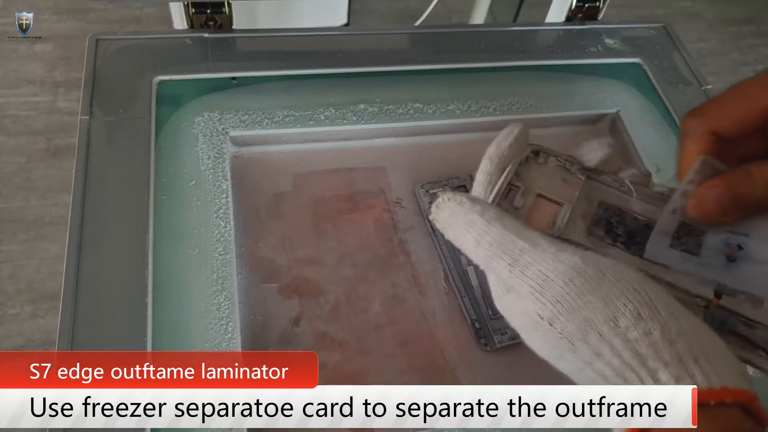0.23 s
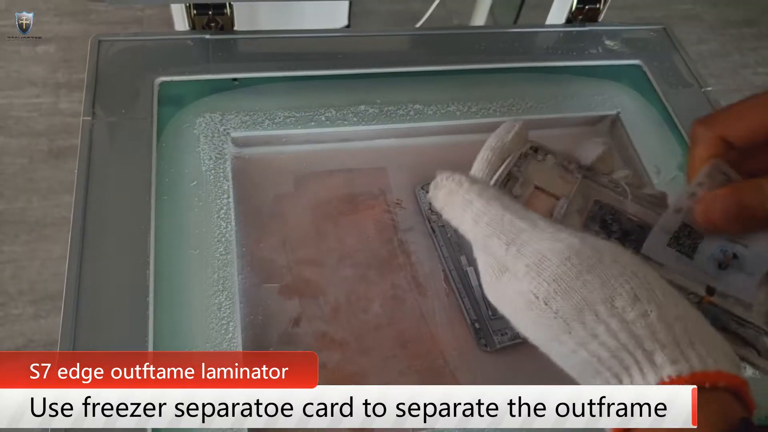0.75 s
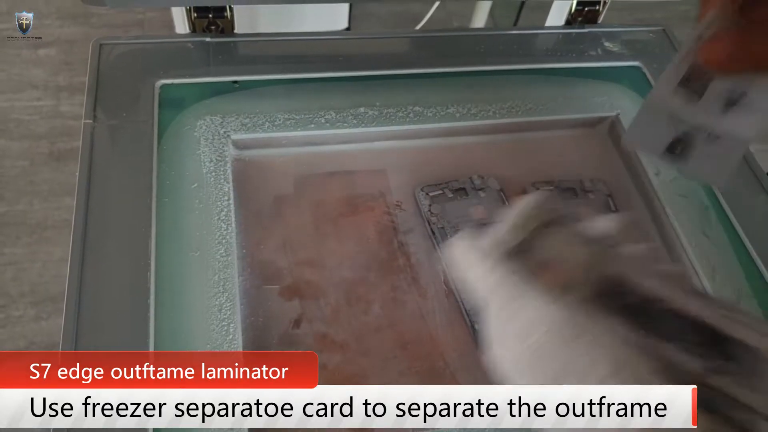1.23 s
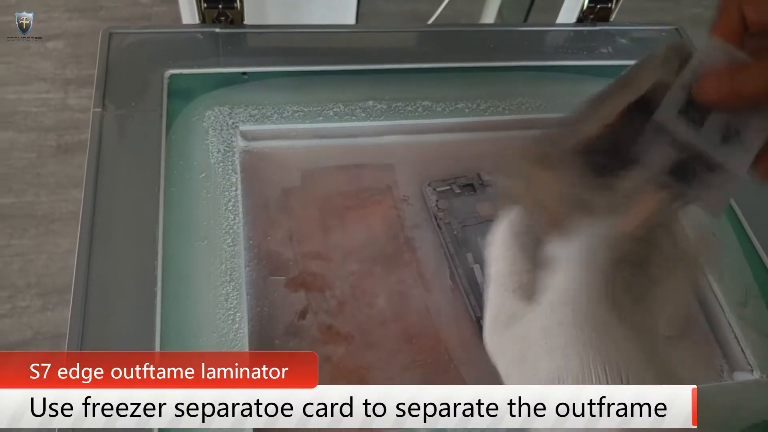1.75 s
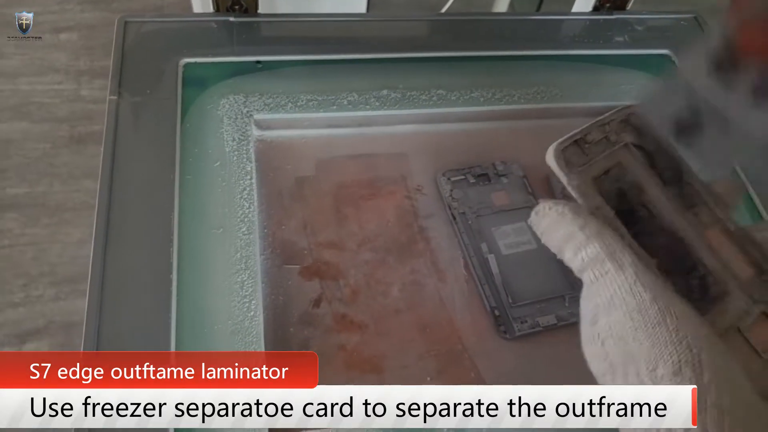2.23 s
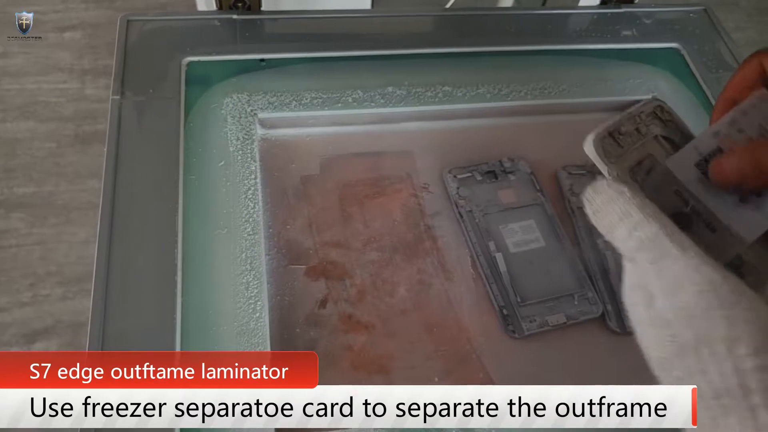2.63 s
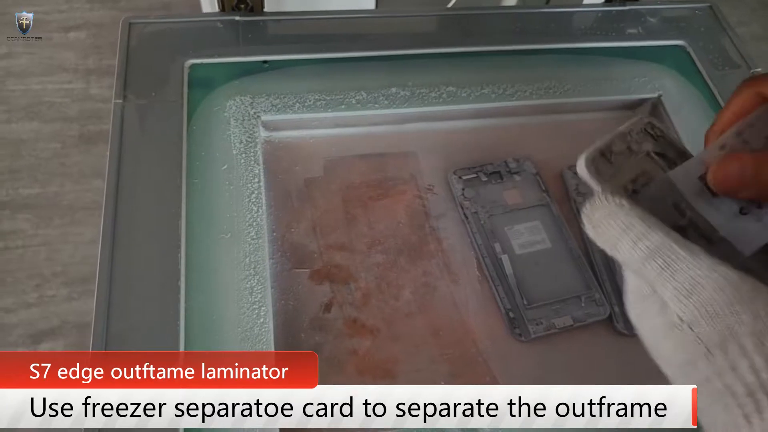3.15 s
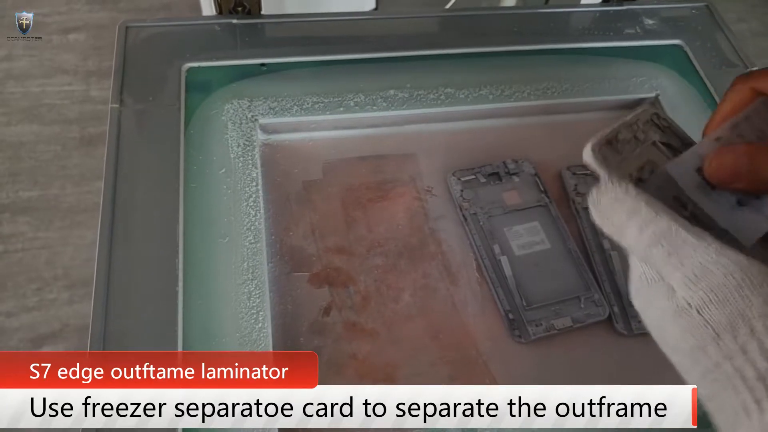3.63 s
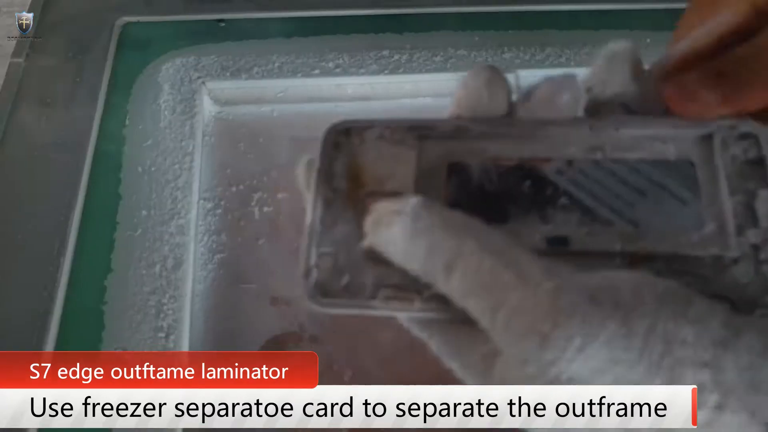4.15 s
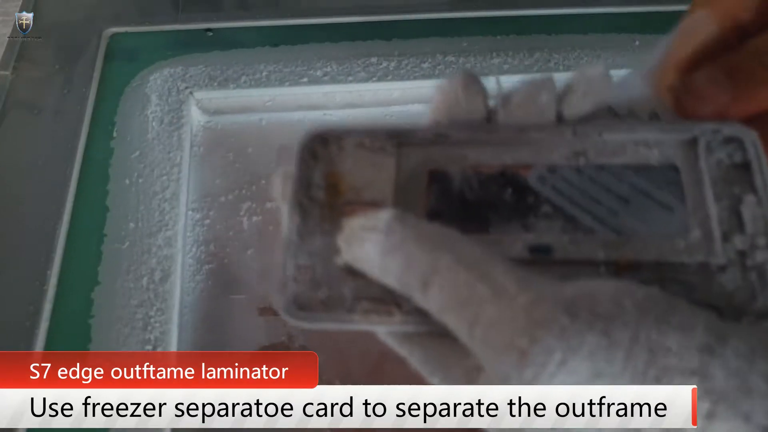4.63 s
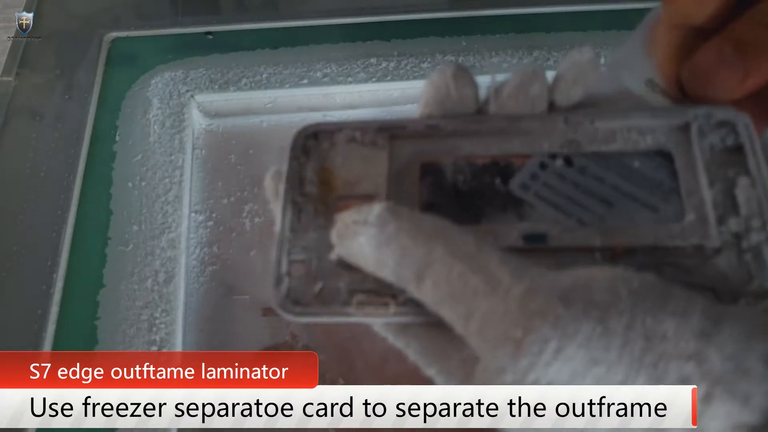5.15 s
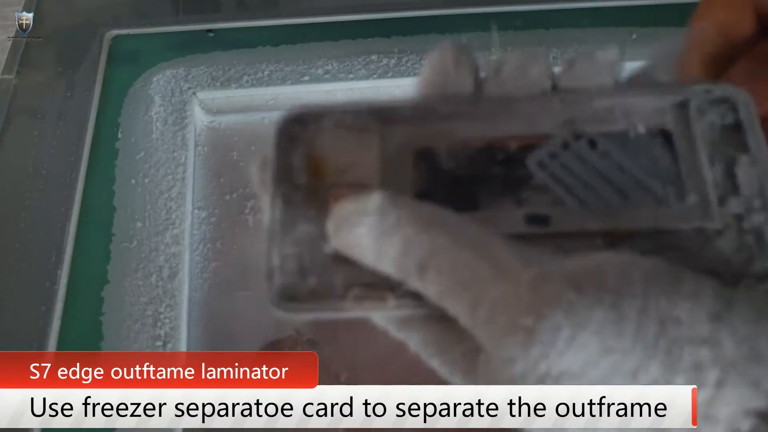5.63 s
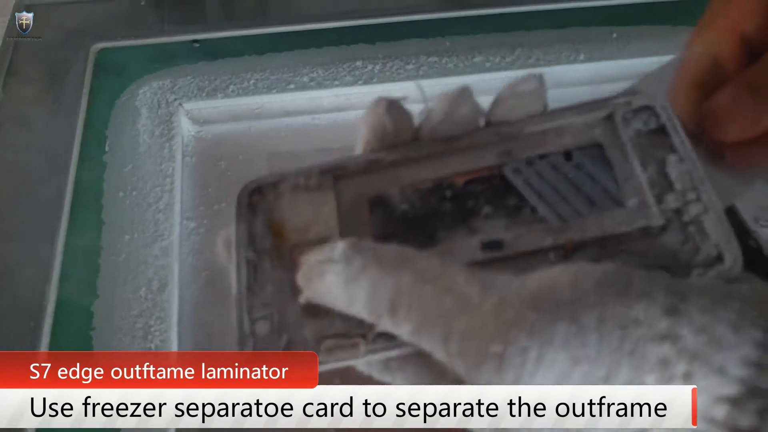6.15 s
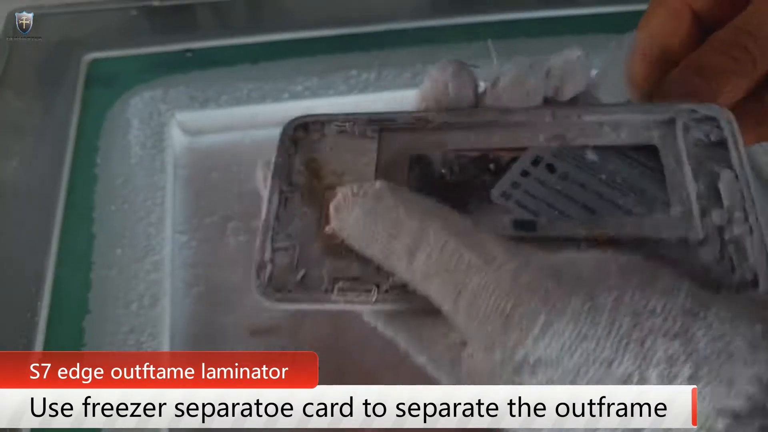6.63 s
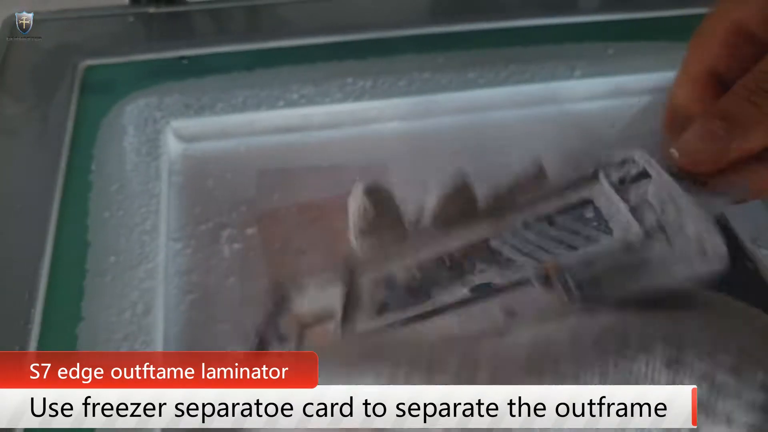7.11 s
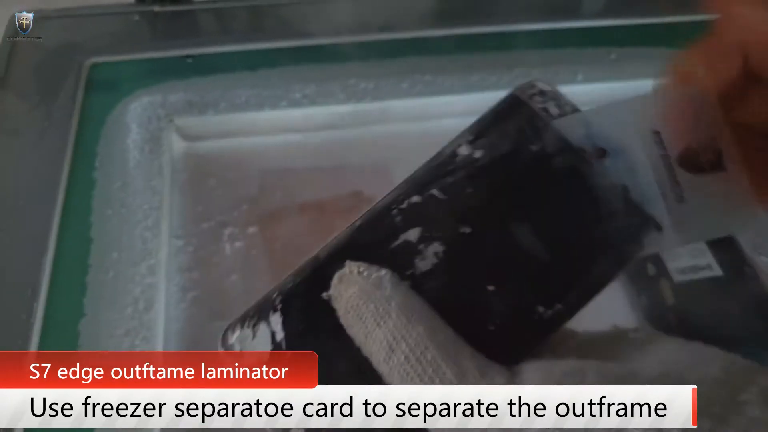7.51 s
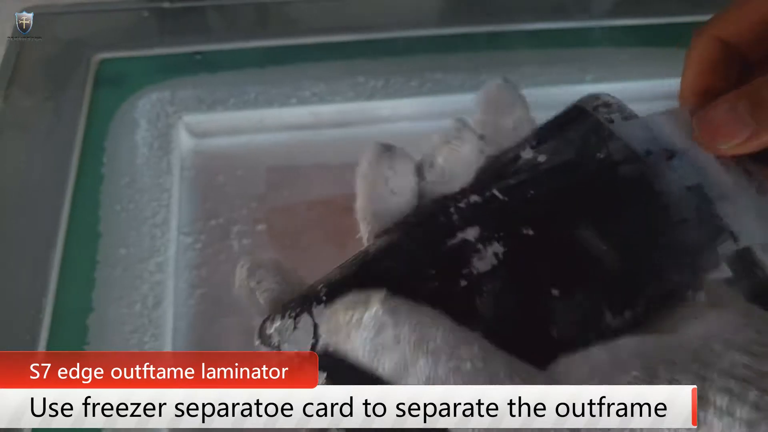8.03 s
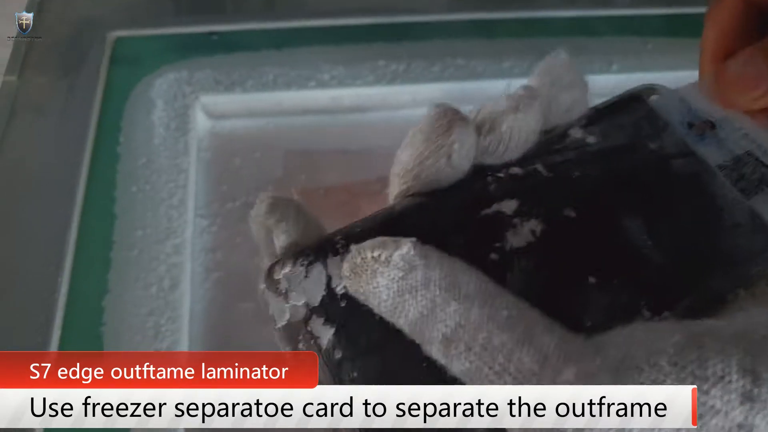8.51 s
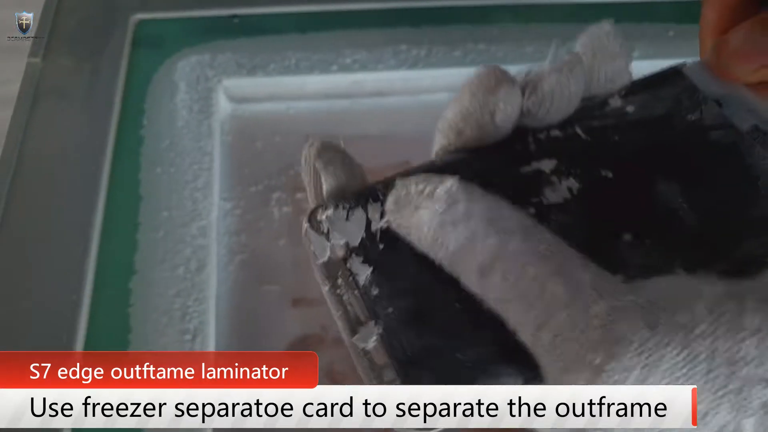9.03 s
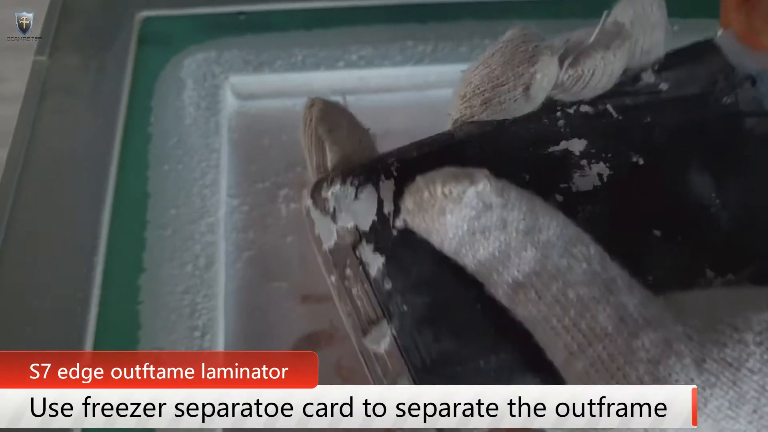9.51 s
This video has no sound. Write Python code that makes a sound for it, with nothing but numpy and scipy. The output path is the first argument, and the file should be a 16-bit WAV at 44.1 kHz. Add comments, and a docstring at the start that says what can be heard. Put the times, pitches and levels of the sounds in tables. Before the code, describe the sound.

A freezing machine in a workshop gives a low, buzzing compressor hum with breathy fan hiss, quiet at first, under a thin high whine. From 0.1 to 0.8 s a card ticks and scrapes rapidly at a frozen phone frame; a stronger ringing snap with a short scrape comes near 1.1 s. Handling then thins to sparse ticks as the hum swells towards 3 s and the whine pulses about four times a second. Clicks and scrapes come around 3.5 s. At 4.2 s the microphone is suddenly close and the whine disappears. Sharp cracks fall at 4.8 and 5.5 s, where the hum drops abruptly and stays subdued. Small ticks lead to a snap at 6.65 s; the hum returns, peaking about 8 s, with a faint whine. Bright snaps and brief scrapes cluster from 8.0 to 9.0 s, with crisp clicks at 9.4 and 9.7 s.

```python
"""A freezer plate for separating phone screens hums in a workshop: compressor harmonics over fan noise.
The hum swells, dips and returns; its high whine drops out once the microphone is close, then returns faintly.
A plastic card is worked into a frozen phone: impulsive ticks and snaps ring the frame, and short
strokes of the card are stick-slip chatter. Knocks are brief swells of one resonance, frost is faint ticks;
drones and thin whistles are single tones that fade in and out."""
import sys
import numpy as np
from scipy import signal
from scipy.fft import rfft, irfft
from scipy.io import wavfile

SR = 44100
rng = np.random.default_rng(int(sys.argv[2]) if len(sys.argv) > 2 else 0)


def file_out(sig):
    """Save sig as 16-bit WAV at sys.argv[1]."""
    # one column per channel
    cols = np.atleast_2d(sig).T
    # limit, then scale
    lim = np.clip(cols, -1, 1)
    pcm = np.round(lim * 32767).astype(np.int16)
    wavfile.write(sys.argv[1], SR, pcm)


N = 430857  # samples

SHAFT_HZ = 48.21
CLOSE_S = 4.18  # from here on the microphone is close over the plate
FADE_S = 0.077  # fade of the whistles and of the whine's beat


def undb(db):
    """Level as amplitude ratio: 20 dB is a factor of ten."""
    return 10 ** (np.asarray(db) / 20)


def curve(rows, column):
    """Envelope: one column of a timed table, joined by straight lines."""
    rows = np.array(rows)
    return np.interp(np.arange(N) / SR, rows[:, 0], rows[:, column])


def colour(rows, hz, column=1):
    """Spectral envelope: gain of a table joined by straight lines in dB over log frequency."""
    rows = np.array(rows)
    return undb(np.interp(np.log(hz + 1), np.log(rows[:, 0]), rows[:, column]))


def bell(hz, centre, width):
    """Lorentzian resonance curve, 1 at its centre."""
    return 1 / (1 + (2 * (hz - centre) / width) ** 2)


def resonances(rows, hz):
    """Modal colouring: gain of resonance peaks whose decibels add."""
    return undb(sum(db * bell(hz, centre, width) for centre, width, db in rows))


def walk(rate):
    """Random modulation: normal draws, `rate` of them per second, joined by straight lines."""
    knots = rng.standard_normal(int(N / SR * rate) + 2)
    return np.interp(np.arange(N) / SR * rate, np.arange(len(knots)), knots)


def hold(start, end, fade_s):
    """Trapezoidal envelope: fade in, hold, fade out."""
    t = np.arange(N) / SR
    return np.clip(np.minimum(t - start, end - t) / fade_s, 0, 1)


def add(out, s, sound):
    """Superposition: mix a stereo sound in at time s."""
    i = max(int(s * SR), 0)
    out[:, i:i + sound.shape[1]] += sound[:, :max(N - i, 0)]


def ports(mid, side):
    """Sum and difference: left and right port from mid and side."""
    return np.array([mid + side, mid - side])


def tone(phase, hz, wide_hz=1400):
    """Interaural phase: a sine of rms 1, further out of step between the ports the higher it is."""
    start = rng.uniform(0, 2 * np.pi)
    apart = np.pi / 4 * np.tanh((hz / wide_hz) ** 1.8)
    return np.sqrt(2) * np.sin(phase + start + np.array([[-apart], [apart]]))


def steady(hz, db, wander=0.6):
    """Phase modulation: a tone of fixed pitch whose phase wanders (radians)."""
    return undb(db) * tone(2 * np.pi * hz * np.arange(N) / SR + wander * walk(9.2), hz)


def closeness(s):
    """Proximity: 0 while the microphone is afar, 1 once it is close over the plate."""
    return np.clip((s - CLOSE_S) / 0.013 + .5, 0, 1)


# one shared loudness curve for hum, fan rush and frost: (time [s], level [dB])
SHARED_LEVEL = [(0, -30), (0.52, -30.5), (1.25, -28.5), (2.47, -23), (3.07, -21.5), (3.51, -23),
                (4.76, -22), (5.03, -25.5), (5.52, -27), (5.535, -40), (5.55, -31), (5.93, -34),
                (6.62, -34), (6.85, -26.5), (7.13, -23.5), (7.78, -22), (8.03, -18.5), (8.62, -25),
                (9.77, -25.5)]
USUAL_DB, RUSH_FOLLOWS = -25, 0.9  # the usual level of the shared curve; dB of fan rush per dB of hum


def machine(hum_db=0, rush_db=-27):
    """Common modulation: compressor, casing and fan swell together; whine, drones, whistles lie on top."""
    close = closeness(np.arange(N) / SR)
    level_db = curve(SHARED_LEVEL, 1)
    turns = np.cumsum(SHAFT_HZ * (1 + 0.00026 * walk(5))) / SR
    tones = compressor(turns, close) + casing(turns, close) + fan_motor(close)
    hum = undb(level_db + hum_db) * tones
    rush = undb(rush_db + RUSH_FOLLOWS * (level_db - USUAL_DB)) * flicker(fan(turns, close))
    return hum + rush + whine(turns) + drones() + whistles()


# compressor harmonics, levels relative to the machine's:
# (multiple of the shaft rate [whole number], level from afar [dB], level from close [dB])
SHAFT_HARMONICS = [(4, 0, -1), (5, -23.5, -25), (6, -20, -16), (7, -26.5, -30.5), (8, -28.5, -27.5),
                   (9, -22.5, -30), (10, -31, -35.5), (15, -19.5, -22), (22, -15.2, -30),
                   (23, -28.5, -32.5), (24, -32, -38), (34, -40, -36), (37, -32, -42), (39, -43, -38),
                   (41, -26.5, -29.5), (42, -34, -33.5), (47, -32.5, -47), (53, -37, -43), (54, -24.5, -33),
                   (58, -26, -35), (61, -50, -37), (65, -42, -39), (78, -35, -42.5), (80, -40, -38),
                   (82, -37, -55), (84, -32.5, -46), (89, -39, -43), (148, -36, -42)]


def compressor(turns, close, waver_db=1.9, hum_waver_db=0.24):
    """Harmonic series of a rotating shaft; the fourth booms steadily, the others waver."""
    out = 0
    for row, (multiple, far_db, close_db) in enumerate(SHAFT_HARMONICS):
        order = round(multiple)
        waver = (waver_db if row else hum_waver_db) * walk(11)
        db = far_db + (close_db - far_db) * close + waver
        out = out + undb(db) * tone(2 * np.pi * order * turns, order * SHAFT_HZ)
    return out


# envelope of the casing's buzz, one line on every shaft multiple: (frequency [Hz], relative level [dB])
CASING_BUZZ = [(1400, -35), (1700, -36.5), (2300, -36), (3100, -63), (4400, -45.5), (5000, -54),
               (6600, -49), (7300, -44), (8300, -55.5), (11500, -63)]


def casing(turns, close, uneven_db=2, close_db=-2, buzz_db=-1):
    """Periodicity: a fine rattle repeats on every shaft turn, with its own waveform at each port."""
    size = 4096  # points in one turn
    hz = np.arange(size // 2 + 1) * SHAFT_HZ
    inside = (hz > CASING_BUZZ[0][0]) * (hz < CASING_BUZZ[-1][0])
    uneven = undb(uneven_db * rng.standard_normal((2, len(hz))))
    lines = colour(CASING_BUZZ, hz) * inside * uneven
    phases = np.exp(2j * np.pi * rng.random(lines.shape))
    turn = irfft(lines * phases) * size / np.sqrt(2)
    rattle = np.array([np.interp(turns % 1, np.arange(size) / size, port) for port in turn])
    return rattle * undb(buzz_db + close_db * close + 1.5 * walk(8.1))


# tones of the fan motor, relative to the machine's level:
# (frequency [Hz], level from afar [dB], level from close [dB])
MOTOR_TONES = [(111.4, -24.5, -25.5), (3010, -30, -44)]


def fan_motor(close):
    """Tonal motor noise: single lines independent of the shaft, with wandering phase."""
    return sum(steady(hz, far_db + (close_db - far_db) * close) for hz, far_db, close_db in MOTOR_TONES)


# spectrum of fan and refrigerant noise:
# (frequency [Hz], relative density from afar [dB per Hz], relative density from close [dB per Hz])
RUSH_SPECTRUM = [(25, -58, -61), (56.3, -39.5, -42.5), (130, -39, -42), (199, -31, -35.5),
                 (415, -37.5, -42), (720, -37.5, -40.5), (1145, -45.5, -49.5), (1470, -52, -56.5),
                 (2000, -49.5, -52), (2920, -49.5, -54.5), (5250, -59.5, -64), (7500, -63, -65),
                 (12200, -58, -61), (16200, -65, -65)]
# narrow resonances in the hiss: (frequency [Hz], width [Hz], boost [dB])
HISS_RESONANCES = [(2120, 130, 1.5), (5660, 170, 4.5), (7360, 250, 11.5), (8080, 230, 7.5),
                   (9140, 250, 3.5), (11100, 320, 2.5)]


def fan(turns, close, wide_hz=750, throb=0.14, flutter_db=2.5, bass_apart=0.034):
    """Coherence of broadband noise: the bass is nearly alike at both ports, the treble unrelated."""
    hz = np.arange(N // 2 + 1) * SR / N
    alike = np.clip(1 - bass_apart, 0, 1) / (1 + (hz / wide_hz) ** 2)
    mid, side = rfft(rng.standard_normal((2, N)))
    noise = ports(mid * np.sqrt((1 + alike) / 2), side * np.sqrt((1 - alike) / 2)) * np.sqrt(SR / 2)
    noise = noise * resonances(HISS_RESONANCES, hz)
    far, near = (irfft(noise * colour(RUSH_SPECTRUM, hz, column), N) for column in (1, 2))
    rush = far * (1 - close) + near * close
    shaft_throb = 1 + throb * np.sin(2 * np.pi * turns)
    return rush * shaft_throb * undb(flutter_db * walk(14))


def flicker(noise, depth_db=1.1):
    """Band modulation: the treble flickers, fast and slow, partly together and partly band by band."""
    hz, spectrum = np.arange(N // 2 + 1) * SR / N, rfft(noise)
    shared = walk(30) + 0.25 * walk(3.5)
    out = noise
    for low, high in [(4500, 7000), (7000, 10500), (10500, 17000)]:
        band = irfft(spectrum * (hz >= low) * (hz < high), N)
        gain = undb(depth_db * (shared + 2.1 * walk(26)))
        out = out + band * (gain - 1)
    return out


# mean level of the high whine: (time [s], level [dB])
WHINE_LEVEL = [(0, -47.5), (0.45, -50.5), (0.85, -46), (1.3, -54), (1.7, -44), (1.88, -54), (2.3, -43),
               (2.88, -37.5), (3.2, -39), (4.16, -37), (4.2, -85), (6.6, -69), (7, -55.5), (8.1, -52),
               (9.77, -56.5)]
WHINE_MULTIPLE = 60  # of the shaft rate
BEAT_FROM_S, BEAT_S = 2.095, 0.258  # first crest and period of the beat
BEAT_DB = (3.5, 2)  # beat depth at the left and right port


def whine(turns, wander=0.15, waver_db=.5):
    """Beating of a high shaft harmonic: an even rise and fall in level until the microphone is close."""
    phase = 2 * np.pi * WHINE_MULTIPLE * turns + wander * walk(40)
    since_crest = np.arange(N) / SR - BEAT_FROM_S
    beat = hold(BEAT_FROM_S, CLOSE_S, FADE_S) * np.cos(2 * np.pi * since_crest / BEAT_S)
    db = curve(WHINE_LEVEL, 1) + waver_db * walk(16.0) + np.outer(BEAT_DB, beat)
    return undb(db) * tone(phase, WHINE_MULTIPLE * SHAFT_HZ, wide_hz=3060)


# the frame ticks and snaps; levels are relative, lifted further on:
# (time [s], level [dB], body ring [dB], edge ring [Hz], treble tilt [dB])
FRAME_SNAPS = [(0.114, -16, -34, 4000, -15), (0.146, -18, -30, 6800, -10), (0.157, -15.5, -33, 11100, -12),
               (0.222, -17, -13, 3900, -12), (0.3386, -13, -30, 4400, -13), (0.3448, -9, -26, 7600, -11),
               (0.366, -20, -17, 4460, -9), (0.374, -15, -34, 3000, -8), (0.444, -26, -31, 7040, -24),
               (0.479, -27, -28, 7500, -4), (0.5403, -11, -41, 4120, -10), (0.65, -19.5, -35, 4260, -14),
               (0.749, -19.5, -36, 4320, -25), (1.0799, -12.5, -27, 4170, -28), (1.1614, -9, 2, 4240, -29),
               (1.168, -17.5, -14, 3000, -28), (1.658, -23, -28, 11000, -17), (2.051, -16, -28, 3200, -52),
               (2.561, -19, -28, 7500, -13), (2.6253, -21, -28, 6500, -3), (3.2365, -11, -37, 3300, -16),
               (3.484, -10, -34, 6190, -14.5), (4.167, -13, -11, 4670, -11), (4.305, -27, -20, 5000, -19),
               (4.6487, -20, -24, 5970, -4), (4.785, -15.5, -6, 4500, -19), (4.8352, -7, -18, 7360, -18),
               (4.8417, -4, -16, 10200, -15), (5.2674, -22.5, -23, 7500, -17),
               (5.5024, -19, -18, 4000, -16), (5.515, -16, -26, 4730, -13), (5.522, -15, -24, 6500, -13),
               (5.531, -3.5, -17, 12500, -6), (5.649, -22.5, -18, 10600, -18),
               (6.103, -26.5, -25, 7000, -13), (6.133, -25.5, -27, 6300, -10),
               (6.146, -25.5, -24, 5300, -16), (6.1943, -31, -24, 6000, -10),
               (6.6503, -12.5, -18, 3980, -9), (6.729, -26, -7, 3900, -13), (6.807, -20.5, -5, 6960, -6),
               (6.999, -19.5, -18, 6740, -16), (7.4743, -25, -16, 7000, -5), (7.846, -23, -22, 7000, -12),
               (8.046, -6, -11, 7550, -3), (8.06, -17, 4, 3000, -20), (8.125, -13.5, -25, 7450, -5),
               (8.3627, -5.5, -0.5, 14500, -2), (8.411, -7, -17, 14400, -9.5), (8.549, -11, -4, 14900, -15),
               (8.776, -15, -18, 13300, -14), (8.927, -20, -28, 15000, -6), (8.954, -16, -28, 15000, -7),
               (9.006, -26, -24, 11900, -19), (9.037, -27, -26, 7000, -15), (9.3657, -5, -20, 7000, -13),
               (9.7205, -11, -21, 14100, -11.5), (9.756, -12.5, -12, 12200, -10)]


def snaps(snap_db=14, edge_width_hz=900, edge_db=8):
    """Impulsive release: frozen glue lets go, and each contact rings its own edge mode and brightness."""
    out = np.zeros((2, N))
    for s, db, body_db, edge_hz, treble_db in FRAME_SNAPS:
        edge = [(edge_hz, edge_width_hz, edge_db)]
        add(out, s, undb(db + snap_db) * crack(np.ones(1), body_db, treble_db, edge))
    return out


# modes of the phone's frame: (frequency [Hz], width [Hz], relative level [dB])
FRAME_MODES = [(1616, 410, 7), (1710, 260, 0.5)]
# colour of the crack itself: (frequency [Hz], relative level [dB])
CRACK_COLOUR = [(300, 3), (900, 1), (2500, 6.5), (4100, 10.5), (5200, 10), (6800, 11.5), (9000, 11),
                (12000, 14), (15500, 11)]
PATCH_HZ = 259.6  # spacing of the frame's many small resonances


def crack(slips, body_db, top_db, edge=(), contact_s=0.0025, room_db=-21,
          ring_db=22, lift_db=12, patchy_db=4.0):
    """Source and filter: slips (energy per sample) free noise bursts, frame modes colour them. Energy 1."""
    size, room_s = 8192, .016
    t, hz = np.arange(size) / SR, np.arange(size // 2 + 1) * SR / size
    swell = t / contact_s
    contact = swell ** 2 * np.exp(2 - 2 * swell)
    room = undb(room_db) * (1 - np.exp(-swell)) * np.exp(-t / room_s)
    energy = np.abs(signal.fftconvolve(slips, (contact + room) ** 2)[:size])
    burst = rng.standard_normal((2, size)) * np.sqrt(energy)
    # the treble tilt grows from 5 to 12 kHz
    gain = colour(CRACK_COLOUR, hz) * undb((top_db + lift_db) * np.clip((hz - 5000) / 7000, 0, 1))
    gain = gain + sum(undb(body_db + ring_db + db) * bell(hz, f, width) for f, width, db in FRAME_MODES)
    gain = gain * resonances(edge, hz)
    gain = gain * undb(patchy_db * np.interp(hz / PATCH_HZ, np.arange(size), rng.standard_normal(size)))
    # minimum phase: the ring follows the blow, never precedes it
    cepstrum = irfft(np.log(gain))
    fold = np.r_[1, np.full(size // 2 - 1, 2), 1, np.zeros(size // 2 - 1)]
    causal = np.exp(rfft(cepstrum * fold))
    sound = irfft(rfft(burst) * causal)
    return sound / np.sqrt(np.sum(sound ** 2) / 2)


# the card slides: (time [s], length [s], level at the start [dB], level at the end [dB],
# edge ring [Hz], edge ring boost [dB], mean slip rate before unevenness [1/s])
CARD_SCRAPES = [(0.264, 0.015, -38, -31.5, 3500, 12, 1000), (0.332, 0.041, -23, -19.5, 4360, 10, 540),
                (0.547, 0.022, -26.5, -25, 4000, 5, 340), (1.106, 0.056, -33.5, -24, 3500, 8, 450),
                (1.552, 0.12, -42, -44, 12000, 2, 150), (2.441, 0.028, -43, -34, 5000, 10, 400),
                (3.489, 0.028, -33, -29, 6300, 0, 350), (3.556, 0.025, -42, -23.5, 8500, 2, 330),
                (4.101, 0.078, -30, -25, 2600, 8.5, 450), (4.846, 0.033, -24, -28.5, 6500, 3, 540),
                (4.887, 0.047, -29, -34, 7100, 15, 116), (5.54, 0.15, -28.5, -50.5, 12500, 6, 420),
                (8.063, 0.061, -33, -35, 11200, 11, 300), (8.286, 0.034, -35, -33, 14500, 11, 310),
                (8.784, 0.039, -31.5, -36.5, 7950, 0, 440), (8.888, 0.082, -39, -44, 14000, 1, 480),
                (9.73, 0.035, -31, -29, 3000, 4, 320)]
SOFT_EDGE_HZ = 4100  # edge ring that leaves the treble tilt unchanged
SLIP_S, SLIP_ROOM_DB, SLIP_SCATTER_DB = 0.0012, -16, 4
HOLLOW = (800, 450, 7)  # the plate's resonance under the card: frequency [Hz], width [Hz], boost [dB]


def scrapes(scrape_db=0, edge_width_hz=1500, body_db=-23, top_db=-13, octave_db=-0.5, uneven=0.16):
    """Stick-slip friction: uneven chatter of tiny cracks, the treble tilt easing as the edge ring rises."""
    out = np.zeros((2, N))
    for s, length, start_db, end_db, edge_hz, edge_db, slips_per_s in CARD_SCRAPES:
        pressure = undb(np.linspace(start_db, end_db, max(int(length * SR), 2)) + scrape_db)
        gaps, sizes = rng.standard_normal(size=(2, 256))
        spacing = np.r_[0, np.exp(uneven * gaps[1:])] * SR / slips_per_s
        at = np.cumsum(spacing).astype(int)
        strength = undb(SLIP_SCATTER_DB * sizes)
        slips = np.bincount(at, strength, len(pressure))[:len(pressure)] * pressure
        treble_db = top_db + octave_db * np.log2(edge_hz / SOFT_EDGE_HZ)
        edge = [(edge_hz, edge_width_hz, edge_db), HOLLOW]
        chatter = crack(slips ** 2, body_db, treble_db, edge, SLIP_S, SLIP_ROOM_DB)
        add(out, s, np.linalg.norm(pressure) * chatter)
    return out


# short knocks, bumps and pings, and a short low thump at 4.17 s: (time [s], frequency [Hz], # level at the
# crest [dB], length [s])
SHORT_KNOCKS = [(0.259, 610, -27, 0.018), (0.343, 623, -24.5, 0.032), (1.079, 1450, -30.5, 0.0099),
                (1.155, 1720, -26, 0.022), (4.166, 90, -19, 0.0048), (4.837, 482, -27, 0.026),
                (4.84, 328, -26, 0.011), (4.837, 675, -27, 0.0084), (6.65, 3930, -31, 0.0089),
                (8.056, 517, -27, 0.017), (8.363, 1480, -26, 0.0086), (8.41, 1430, -27, 0.0093),
                (8.546, 1720, -32, 0.0087), (9.367, 6000, -15.5, 0.0035)]


def knocks(rough=0.47, rough_per_s=400):
    """Damped forced resonance: an uneven push swells one tone up and back down, with no ring after it."""
    out = np.zeros((2, N))
    for s, hz, db, length in SHORT_KNOCKS:
        t = np.arange(int(length * SR)) / SR
        push, bend = (rough * walk(rough_per_s)[:len(t)] for _ in range(2))
        swell = np.sin(np.pi * t / length) ** 2 * (1 + push)
        add(out, s, undb(db) * swell * tone(2 * np.pi * hz * t + bend, hz))
    return out


def frost(count=30, tick_db=-18, scatter_db=3, body_db=-21, top_db=-12):
    """Random impulses: faint ticks of frost and frame under the glove, scaled by the shared loudness curve."""
    out = np.zeros((2, N))
    for s, size in zip(rng.uniform(0, N / SR, count), rng.standard_normal(count)):
        add(out, s, undb(tick_db + scatter_db * size) * crack(np.ones(1), body_db, top_db))
    return out * undb(curve(SHARED_LEVEL, 1) - USUAL_DB)


# two low drones take turns: (start [s], end [s], frequency [Hz], mean level [dB])
LOW_DRONES = [(-0.2, 4.5, 56.4, -50), (8.3, 14, 83.3, -48)]


def drones(waver_db=2, fade_s=0.27):
    """Slow amplitude modulation: each low tone fades in, holds with a waver and fades out."""
    return sum(hold(start, end, fade_s) * steady(hz, db + waver_db * walk(9), wander=0.35)
               for start, end, hz, db in LOW_DRONES)


# thin whistles come and go in the machine: (start [s], end [s], frequency [Hz], mean level [dB])
THIN_WHISTLES = [(1.45, 1.68, 3471, -52), (2.3, 2.53, 3471, -44), (2.8, 3.01, 3471, -49),
                 (4.2, 4.9, 7250, -50), (4.18, 4.98, 2170, -52), (8.62, 8.8, 3760, -51),
                 (9.14, 9.5, 3760, -55)]


def whistles(flutter_db=2):
    """Fast amplitude modulation: each thin tone sets in quickly and holds with a fine flutter."""
    return sum(hold(start, end, FADE_S) * steady(hz, db + flutter_db * walk(60))
               for start, end, hz, db in THIN_WHISTLES)


CONTACT_PAN_DB = -0.5  # left minus right: the clicks, scrapes and knocks lie a little to the right


def scene():
    """Superposition: the machine under the clicks, scrapes, ticks and knocks."""
    contacts = snaps() + scrapes() + frost() + knocks()
    return machine() + contacts * undb(np.array([[CONTACT_PAN_DB], [-CONTACT_PAN_DB]]) / 2)


def record(dry, top_hz=16100):
    """Band limiting: a steep elliptic low-pass cuts the top."""
    return signal.sosfilt(signal.ellip(10, .2, 80, top_hz, fs=SR, output="sos"), dry)


dry = scene()
out = record(dry)
file_out(out)
```